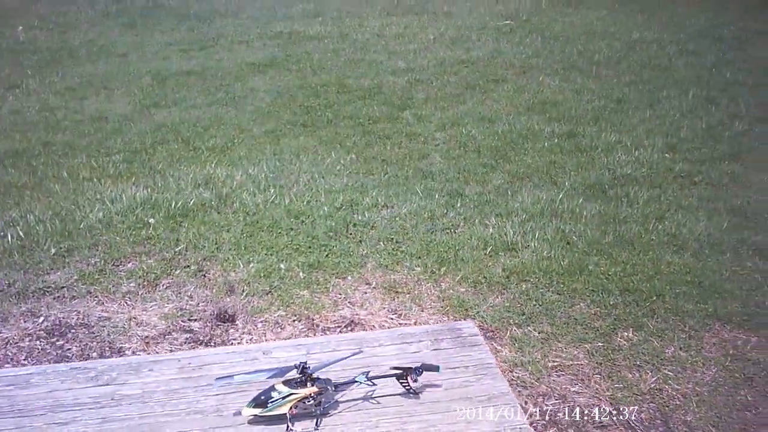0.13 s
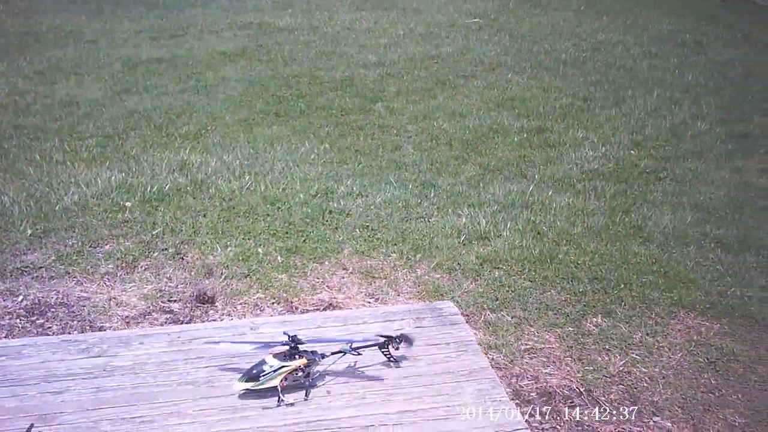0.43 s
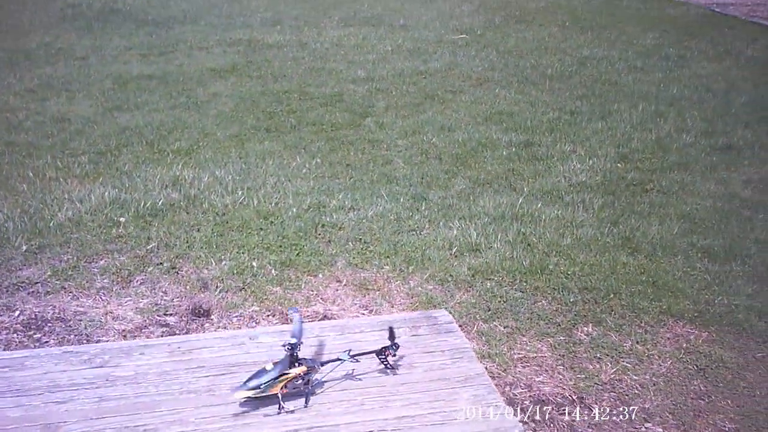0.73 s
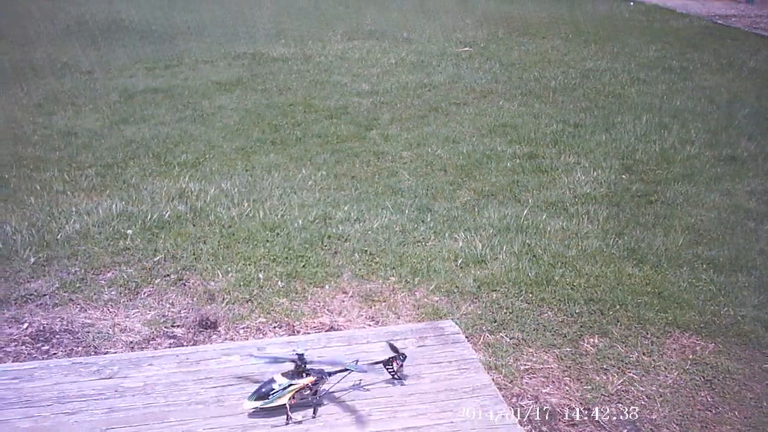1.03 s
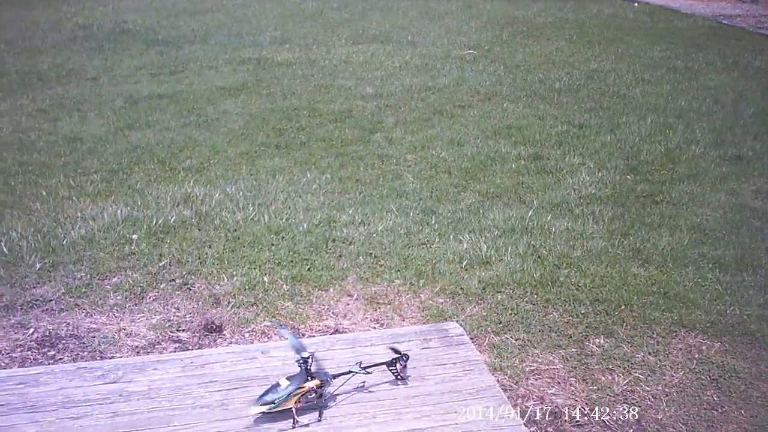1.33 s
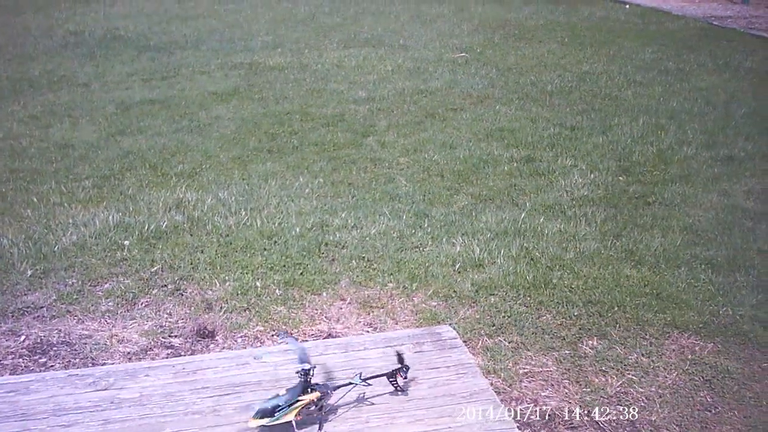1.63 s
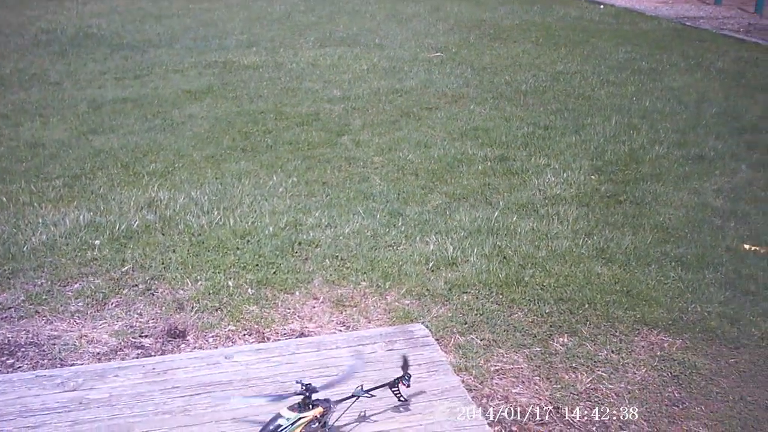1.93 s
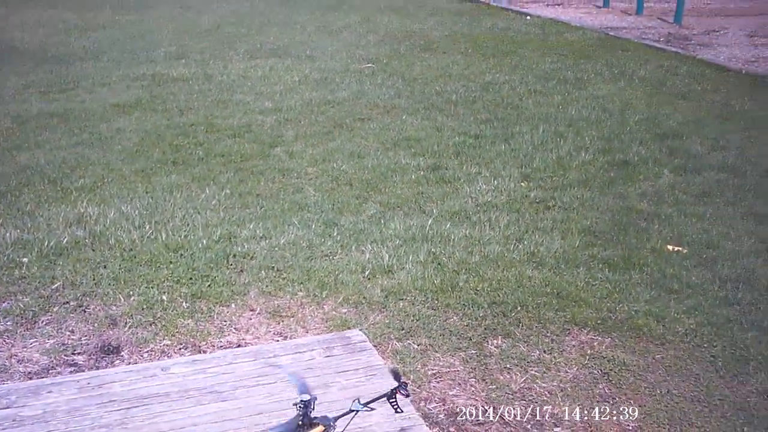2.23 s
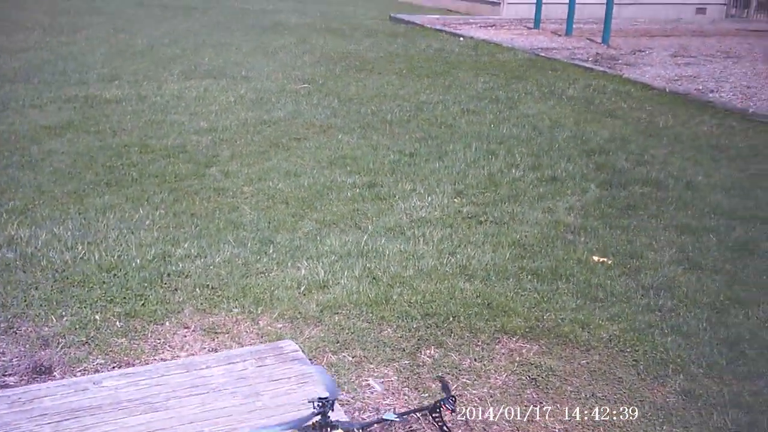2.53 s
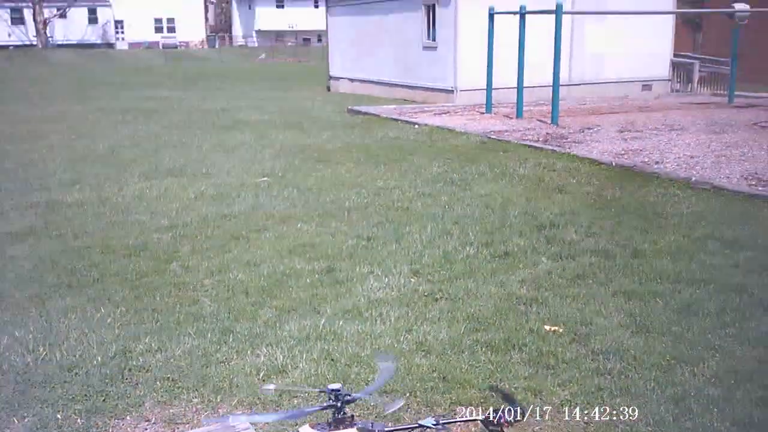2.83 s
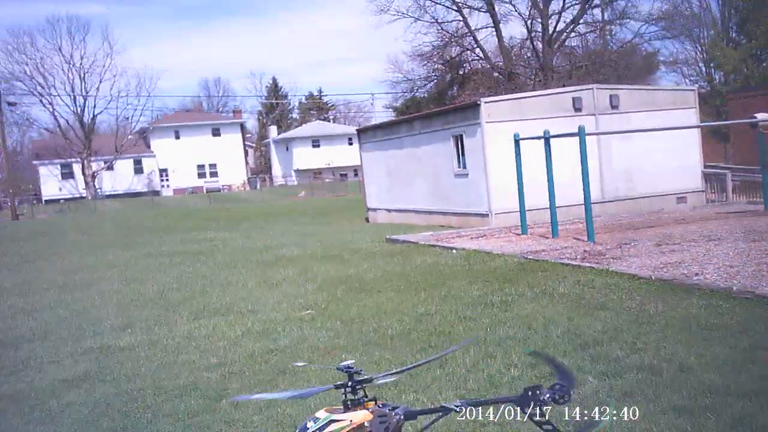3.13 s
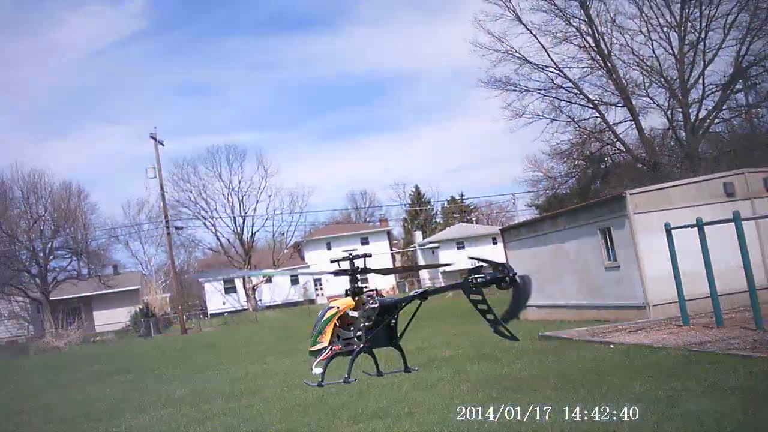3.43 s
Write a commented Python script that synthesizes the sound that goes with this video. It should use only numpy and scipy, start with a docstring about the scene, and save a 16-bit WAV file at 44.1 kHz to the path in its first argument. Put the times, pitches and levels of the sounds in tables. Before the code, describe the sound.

A small electric model helicopter starts with a brief squeak, its whine rising over rattling gears and rushing rotor air. Several sharp clacks come as it lifts off, close to a thin-sounding microphone outdoors.

```python
"""A wooden deck, where a small electric model helicopter spools up and lifts off past a cheap
narrow-band microphone, close enough for the downdraught to buffet it. The gears catch with a squeak,
the motor's nine-tooth pinion whines and rattles against the main gear, and the two blades stir the air.
A few sharp clacks from the rotor head overload the microphone at lift-off."""
import sys
import numpy as np
from scipy import signal
from scipy.fft import rfft, irfft
from scipy.io import wavfile

SR = 44100
rng = np.random.default_rng(int(sys.argv[2]) if len(sys.argv) > 2 else 0)


def pcm_store(signal):
    """Save signal as 16-bit PCM."""
    levels = np.round(np.clip(np.atleast_2d(signal), -1, 1) * 32767)
    wavfile.write(sys.argv[1], SR, levels.astype(np.int16).T)


N = 158760
TIME = np.arange(N) / SR
PINION_TEETH, GEAR_RATIO, BLADES = 9, 10, 2


def amp(db):
    """Decibels to gain."""
    return 10 ** (np.asarray(db) / 20)


def unit(x):
    """Scales to rms 1."""
    return x / np.sqrt(np.mean(x ** 2) + 1e-20)


def curve(rows, column=1):
    """One column of a table, joined by straight lines in time."""
    rows = np.array(rows)
    return np.interp(TIME, rows[:, 0], rows[:, column])


def colour(x, rows, column=1):
    """Filters x by a spectrum table; rms 1."""
    rows, hz = np.array(rows), np.fft.rfftfreq(N, 1 / SR)
    gain_db = np.interp(np.log(hz + 1), np.log(rows[:, 0]), rows[:, column])
    return unit(irfft(rfft(x) * amp(gain_db), N))


def noise():
    """White noise."""
    return rng.standard_normal(N)


def drift(hz):
    """Random wander up to about hz; rms 1."""
    rolloff = np.exp(-(np.fft.rfftfreq(N, 1 / SR) / hz) ** 2)
    return unit(irfft(rfft(noise()) * rolloff, N))


def angle(hz):
    """Running phase of a frequency curve."""
    return 2 * np.pi * np.cumsum(hz) / SR


def narrow_noise(hz, width_hz):
    """A fuzzy tone around a frequency curve; rms about 1."""
    return drift(width_hz) * np.cos(angle(hz)) + drift(width_hz) * np.sin(angle(hz))


def low_pass(x, hz, taps):
    """Steep linear-phase low-pass."""
    kernel = signal.firwin(taps, hz, window=("kaiser", 8), fs=SR)
    return signal.oaconvolve(x, kernel[None], "same")


def background():
    """The ambience on the deck: steady hiss with a wavering low hum."""
    # spectrum of the hiss: frequency_hz, gain_db
    hiss_colour = [(20, -6.5), (55, -9), (100, -2), (200, -2.5), (500, -2.5), (1050, 0), (1700, -10),
                   (2600, 2.5), (3500, -7), (4200, -8.5)]
    hiss = amp(-40.5) * colour(noise(), hiss_colour)
    hum = amp(-51) * narrow_noise(np.full(N, 85.2), width_hz=7.1)
    return hiss + hum


def rotor_air(blade):
    """Air chopped by the blades, and its gusts on the microphone."""
    # rush of air from the rotor: time_s, level_db
    wash_level = [(0, -52), (.22, -40), (.29, -34), (.36, -38.5), (.6, -39), (1, -33.5), (1.5, -30.5),
                  (2, -30.5), (2.55, -27), (2.95, -31), (3.35, -29), (3.6, -29)]
    # its spectrum: frequency_hz, gain_db
    wash_colour = [(60, -15), (150, -9.5), (260, -5), (450, -2.5), (700, -0.5), (1000, 0.5), (1400, 0.5),
                   (1900, -2), (2600, -1.5), (4200, -14)]
    # downdraught on the microphone: time_s, level_db
    buffet_level = [(0, -58), (.3, -46.5), (1.15, -45.5), (1.3, -38.5), (1.48, -36.5), (1.58, -48),
                    (1.75, -40.5), (2.1, -49), (2.8, -46), (3.2, -40), (3.6, -43)]
    # its spectrum: frequency_hz, gain_db
    buffet_colour = [(20, -3), (60, -2), (150, -3.5), (250, -6.5), (600, -23.5), (2000, -39.5)]
    wash = amp(curve(wash_level)) * colour(noise(), wash_colour)
    buffet = amp(curve(buffet_level)) * colour(noise(), buffet_colour)
    return wash * (1 + .12 * np.cos(blade)) + buffet


def knocking(throttle, shaft):
    """The rattle's pulsing, once per shaft turn: deeper when slow, smoother at speed."""
    slow_depth, fast_depth = .21, .088
    depth = slow_depth + (fast_depth - slow_depth) * throttle ** 3
    return (1 + depth * np.cos(shaft)) / np.sqrt(1 + depth ** 2 / 2)


def gear_rattle(throttle, shaft, blade):
    """Teeth scrape and tick into the frame, whose colour shifts as the skids leave the deck."""
    # loudness of the rattle: time_s, level_db
    rattle_level = [(0, -66), (.12, -67), (.15, -43.5), (.2, -40), (.3, -28.5), (.345, -32), (.39, -28.5),
                    (.45, -29), (.54, -28), (.67, -27.5), (.85, -29), (1.04, -26), (1.2, -25), (1.5, -22.5),
                    (1.8, -23.5), (2.4, -20.5), (2.72, -22), (3.08, -21.5), (3.3, -18.5), (3.6, -17)]
    # resonance of the frame: frequency_hz, on_deck_db, in_flight_db
    frame_colour = [(680, -44, -36), (1870, -30.5, -10), (2240, -1.5, -9.5), (2580, -0.5, -3.5),
                    (3020, 0, -0.5), (2960, -3.5, -2.5), (3510, -0.5, -2.5), (3956, -8.5, -8),
                    (4270, -21.5, -16.5)]
    ticks_per_s, tick_spread_db, tick_share = 2200, 4.5, .3
    unload_start_s, unload_length_s = 1.3, .99
    ticks = noise() * (rng.random(N) < ticks_per_s / SR)
    ticks *= amp(tick_spread_db * np.minimum(rng.exponential(1, N), 3))
    scrape = np.sqrt(tick_share) * unit(ticks) + np.sqrt(1 - tick_share) * noise()
    force = scrape * knocking(throttle, shaft) * (1 + .1 * np.cos(blade))
    on_deck, in_flight = colour(force, frame_colour), colour(force, frame_colour, column=2)
    airborne = np.clip((TIME - unload_start_s) / unload_length_s, 0, 1)
    frame = (1 - airborne) * on_deck + airborne * in_flight
    return frame * amp(curve(rattle_level) + .5 * drift(hz=25))


def gear_squeak():
    """A stuttering chirp that jumps upward as the gears catch and take up the load."""
    # path of the squeak: time_s, pitch_hz, relative_db
    path = [(.21, 2500, -48), (.245, 2520, -30), (.268, 2550, -29), (.273, 2600, -19), (.278, 2800, -18),
            (.284, 3400, -24), (.294, 3300, -40), (.303, 3400, -25), (.312, 3950, -32), (.323, 3850, -28),
            (.34, 3600, -50)]
    gain_db, waver_hz, stutter_hz, crest_s = -2.5, 44, 100, .273
    tone = np.sqrt(2) * np.sin(angle(curve(path) + waver_hz * drift(hz=294)))
    stutter = 1 + .55 * np.cos(2 * np.pi * stutter_hz * (TIME - crest_s))
    sounding = (TIME > path[0][0]) & (TIME < path[-1][0])
    return tone * stutter * amp(gain_db + curve(path, column=2)) * sounding


def swells_and_whistles(throttle, shaft):
    """Shrill narrow swells over the rattle, plus falling whistles from the recorder's aliasing."""
    # swells and whistles: middle_s, length_s, pitch_hz, glide_hz_per_s, level_db
    swells = [(0.395, 0.068, 2926, 2500.5, -37.5), (0.396, 0.061, 2190, 1501.5, -36.5),
              (.465, 0.068, 970, 3001, -42), (.485, 0.037, 2176, 4500.5, -33.5),
              (0.538, .07, 2398, 1998.5, -32.5), (0.558, 0.18, 2669, -0.5, -27.5),
              (0.94, 0.23, 2578, 0.5, -27), (1.028, .08, 740, 0, -38.5), (1.044, 0.14, 2570, 0.5, -24),
              (1.139, 0.086, 2664, -1.5, -26), (1.24, 0.12, 3597, -3000, -27.5),
              (2.004, 0.51, 2726, -2000, -30), (3.21, 0.24, 2680, -1100, -23),
              (3.463, 0.38, 2980, 1, -22.5)]
    out = np.zeros(N)
    for middle_s, length_s, pitch_hz, glide_hz_per_s, level_db in swells:
        t = TIME - middle_s
        envelope = amp(level_db) * np.exp(-(2 * t / length_s) ** 2)
        out += envelope * narrow_noise(pitch_hz + glide_hz_per_s * t, width_hz=110)
    pulse_depth = .84 * (1 - throttle ** 3)
    return out * (1 + pulse_depth * np.cos(shaft))


def gear_whine(shaft, blade):
    """Tooth-mesh tone, swelling with each turn of the pinion and each passing blade."""
    # fundamental of the meshing teeth, before the fade-in: time_s, level_db
    mesh_level = [(.38, -66), (.47, -37), (.72, -41.5), (.81, -31.5), (.92, -29), (1, -36.5), (1.15, -38.5),
                  (1.25, -19.5), (1.39, -25.5), (1.53, -20), (1.7, -22.5), (1.83, -25.5), (1.95, -36.5),
                  (2.5, -33.5), (3.1, -29), (3.6, -28)]
    # its second harmonic, likewise: time_s, level_db
    overtone_level = [(.44, -62), (.49, -37), (.54, -31), (.62, -36), (.7, -32.5), (.75, -26.5),
                      (.85, -30.5), (.95, -26.5), (1.05, -37), (1.15, -51)]
    start_s, fade_in_s = .14, .42
    wobble = 1 + .16 * np.cos(shaft) + .33 * np.cos(blade) + .087 * drift(hz=90)
    mesh = PINION_TEETH * shaft + .28 * drift(hz=120)
    fundamental = amp(curve(mesh_level)) * np.sin(mesh)
    overtone = amp(curve(overtone_level)) * np.sin(2 * mesh + .5 * drift(hz=80))
    fade_in = np.clip((TIME - start_s) / fade_in_s, 0, 1)
    return np.sqrt(2) * wobble * (fundamental + overtone) * fade_in


def motor_and_rotor_tones(throttle, shaft, blade):
    """Motor, blade and tail-rotor tones follow the shaft speed; their balance shifts with the load."""
    # stages from spool-up to flight: time_s
    stages_s = [1.05, 1.548, 2.12, 2.45, 2.999, 3.4]
    # motor, blade and tail-rotor tones: shaft_multiple, then relative_db at each stage
    tones = [(.4, -54.5, -53.5, -53, -56.5, -46.5, -50.5), (1, -64, -54.5, -46.5, -42.5, -60, -61.5),
             (1.2, -48.5, -47.5, -47.5, -48.5, -64, -54), (1.733, -60, -43.5, -51.5, -41, -57.5, -58),
             (2.8, -61.5, -61, -53, -52, -57.5, -43), (3, -47, -45, -50.5, -41, -39.5, -32),
             (4, -39, -40, -45.5, -44, -43.5, -44), (5, -45.5, -48.5, -33, -39.5, -40.5, -47),
             (6, -54.5, -55, -43, -37.5, -36, -35), (7, -51, -53.5, -39, -36, -42.5, -27.5),
             (10, -42, -39, -39, -52.5, -35, -46)]
    out = np.zeros(N)
    for multiple, *levels_db in tones:
        wavering_db = np.interp(TIME, stages_s, levels_db) + 1.5 * drift(hz=12)
        out += amp(wavering_db) * np.sin(multiple * shaft + 2 * np.pi * rng.random())
    return np.sqrt(2) * out * throttle ** 2.3 * (1 + .25 * np.cos(blade))


def rotor_clacks():
    """Hard knocks of the rotor head that ring the plastic frame for a few milliseconds."""
    # knocks: start_s, peak_db
    knocks = [(.5385, -15.5), (1.046, -12), (3.2, -3), (3.2845, 2), (3.31, -9), (3.324, -3), (3.3395, 0.5),
              (3.397, 0), (3.4345, -4), (3.496, 2.5)]
    # frame modes, detuned afresh for each knock: nominal_hz, relative_db
    modes = [(1200, -9.5), (2650, -25), (3150, 1.5), (3750, -2)]
    rise_s = .0007
    out = np.zeros(N)
    t = np.arange(SR // 50) / SR
    envelope = t / rise_s * np.exp(-t / rise_s)
    for start_s, peak_db in knocks:
        ring = sum(amp(db) * np.cos(2 * np.pi * hz * rng.uniform(.87, 1.05) * (t - rise_s))
                   for hz, db in modes)
        clack = envelope * ring
        out[round(start_s * SR):][:len(t)] += amp(peak_db) * clack / abs(clack).max()
    return out


def scene():
    """The helicopter at close range: one motor shaft drives the gears and the rotors."""
    # spool-up of the motor shaft: time_s, speed_hz
    spool_up = [(0, 4), (.14, 8), (.3, 55), (.45, 103), (.5, 123), (.63, 149), (.76, 171), (.92, 191),
                (1.128, 218), (1.252, 248.2), (1.418, 285.5), (1.616, 317.8), (1.838, 341.5), (2.05, 359.5),
                (2.28, 367.6), (2.65, 368), (2.95, 370.4), (3.47, 369), (3.6, 364.5)]
    speed_hz, jitter_hz = curve(spool_up), .5694
    throttle = speed_hz / speed_hz.max()  # fraction of top speed
    shaft = angle(speed_hz + jitter_hz * drift(hz=13.37))
    blade = shaft * BLADES / GEAR_RATIO  # phase: one cycle per passing blade
    mix = gear_whine(shaft, blade) + motor_and_rotor_tones(throttle, shaft, blade)
    mix += gear_rattle(throttle, shaft, blade) + swells_and_whistles(throttle, shaft)
    return (mix + rotor_air(blade) + gear_squeak() + rotor_clacks() + background())[None]


def record(dry):
    """A narrow-band mono microphone with a faint resampling image; the loudest peaks overload it."""
    image_hz, image_db, dc_offset, ceiling = 10650, -68.5, .012, .82
    narrow = low_pass(dry, hz=4100, taps=441)
    image = narrow * 2 * amp(image_db) * np.cos(2 * np.pi * image_hz * TIME)
    overloaded = np.clip(narrow + image + dc_offset, -ceiling, ceiling)
    return low_pass(overloaded, hz=15800, taps=511)


dry = scene()
out = record(dry)
pcm_store(out)
```